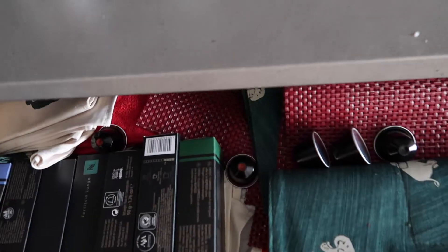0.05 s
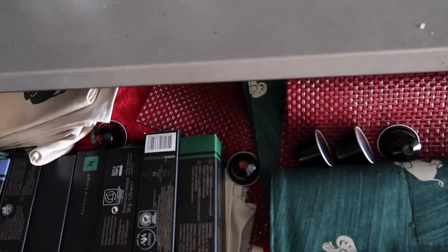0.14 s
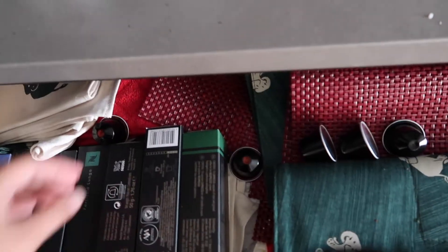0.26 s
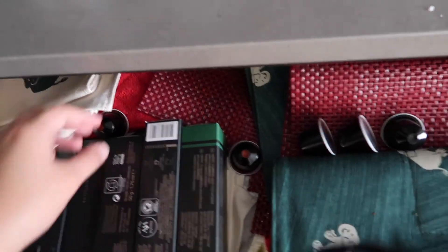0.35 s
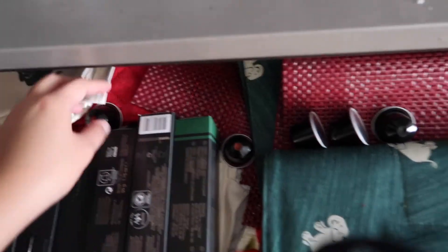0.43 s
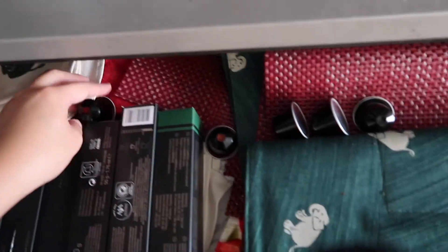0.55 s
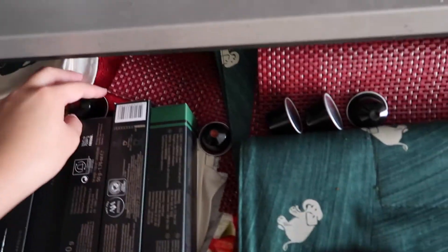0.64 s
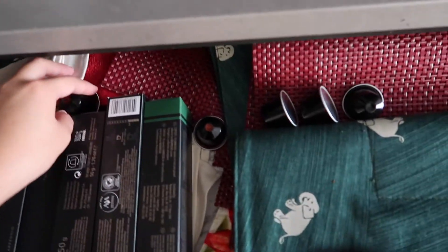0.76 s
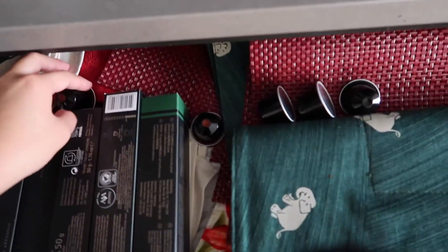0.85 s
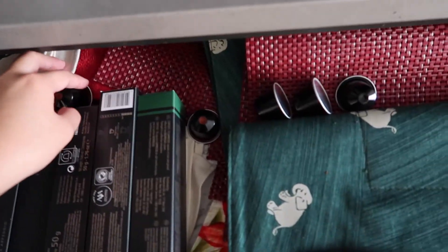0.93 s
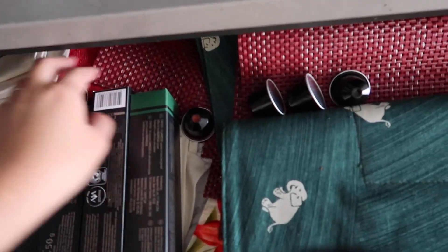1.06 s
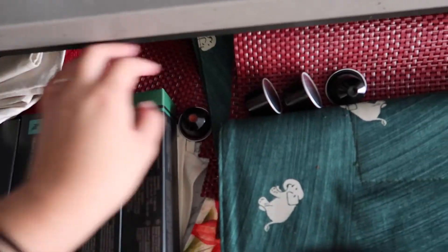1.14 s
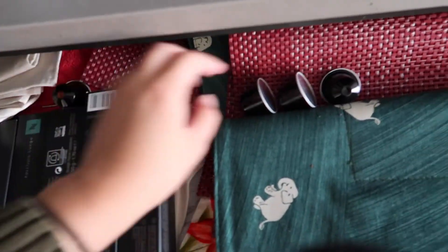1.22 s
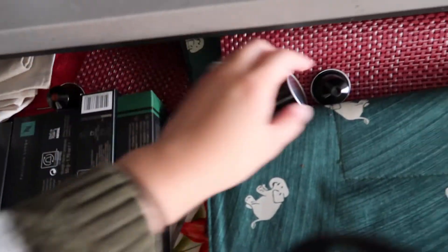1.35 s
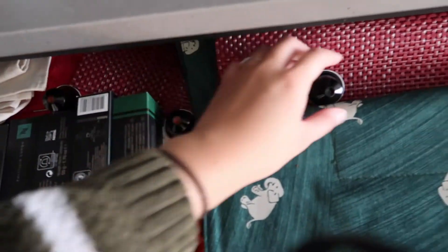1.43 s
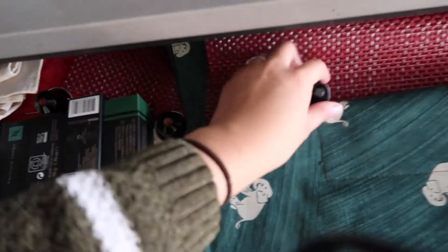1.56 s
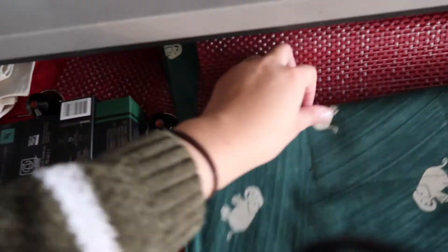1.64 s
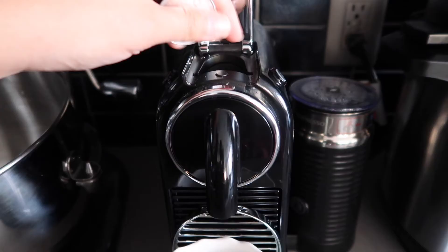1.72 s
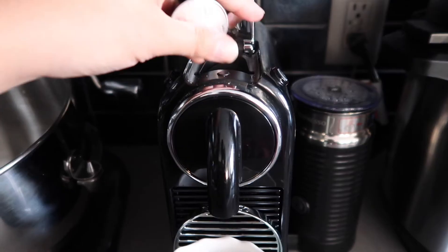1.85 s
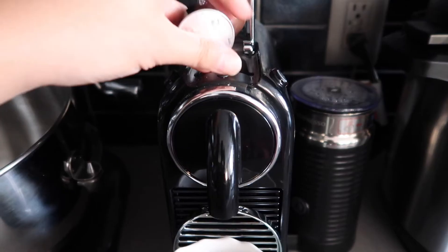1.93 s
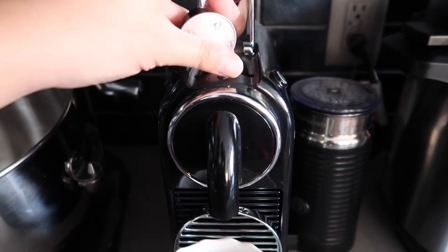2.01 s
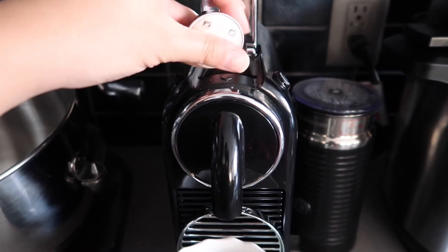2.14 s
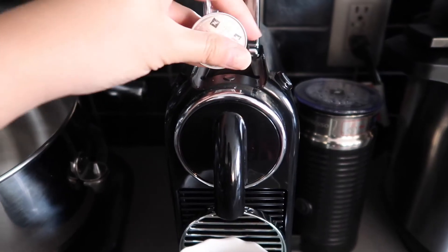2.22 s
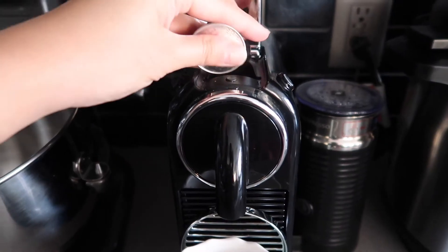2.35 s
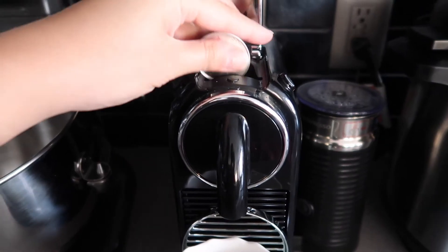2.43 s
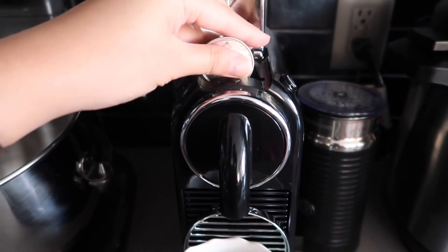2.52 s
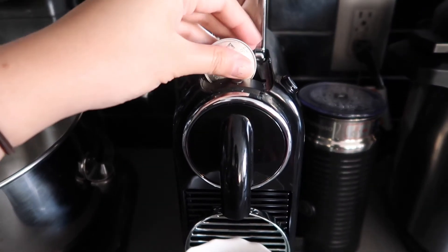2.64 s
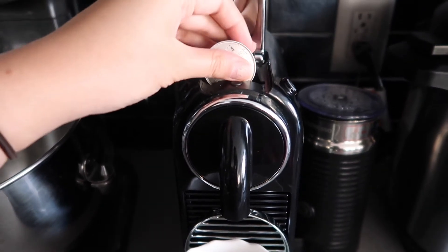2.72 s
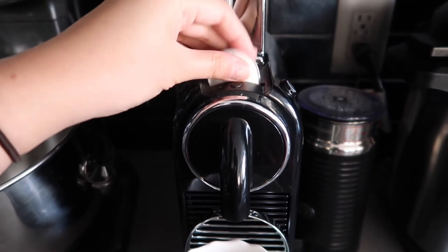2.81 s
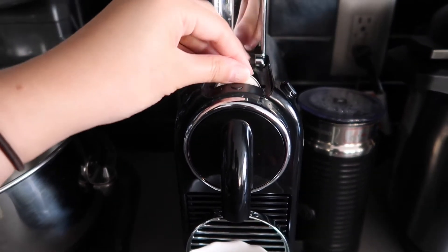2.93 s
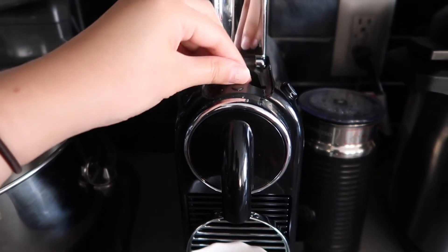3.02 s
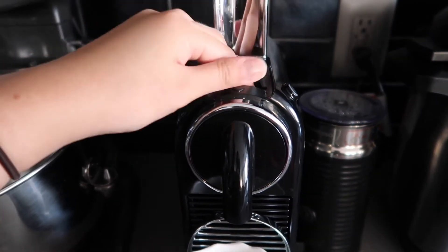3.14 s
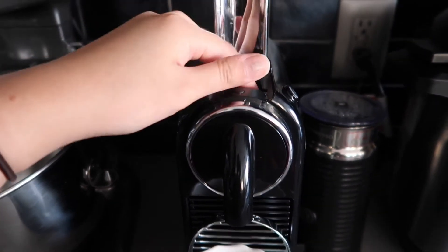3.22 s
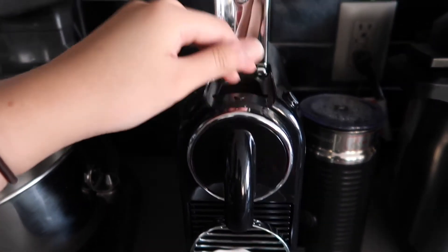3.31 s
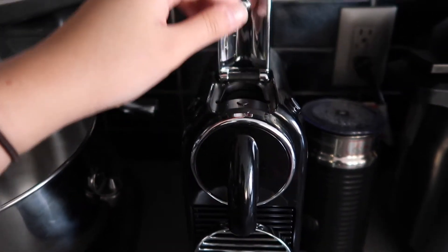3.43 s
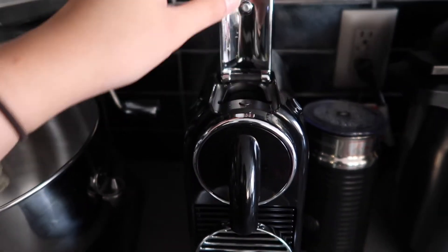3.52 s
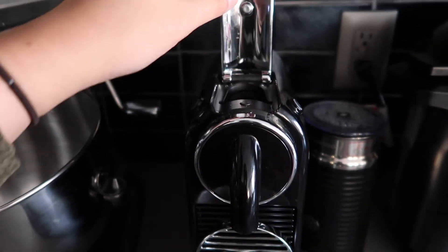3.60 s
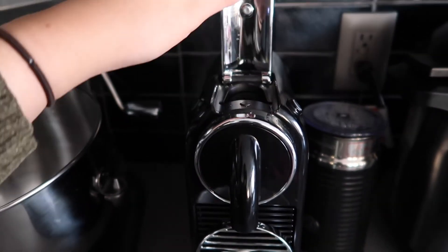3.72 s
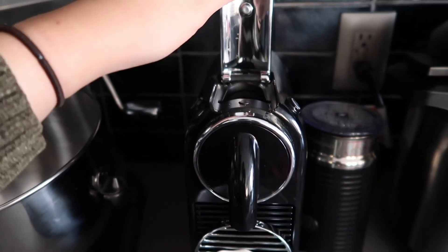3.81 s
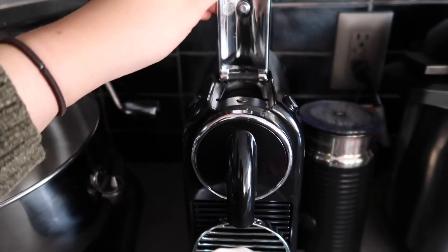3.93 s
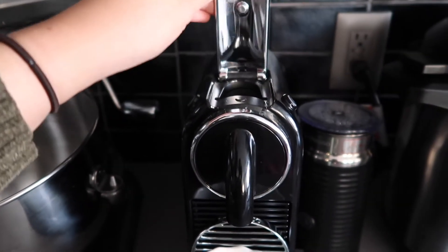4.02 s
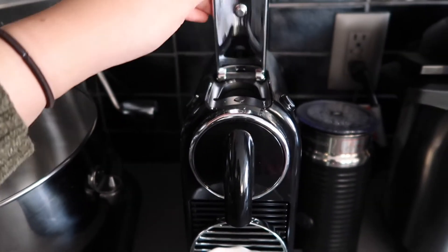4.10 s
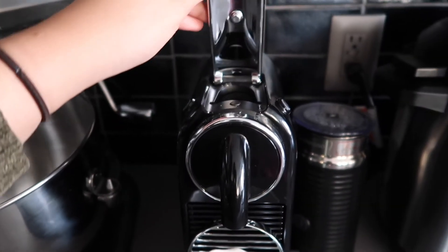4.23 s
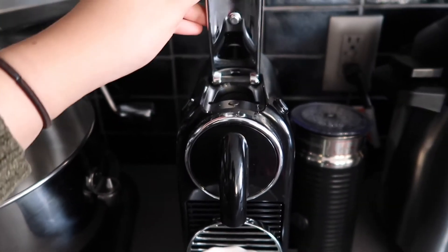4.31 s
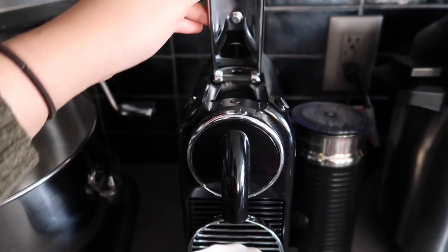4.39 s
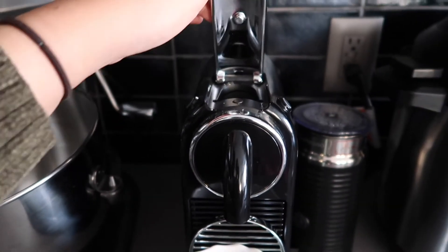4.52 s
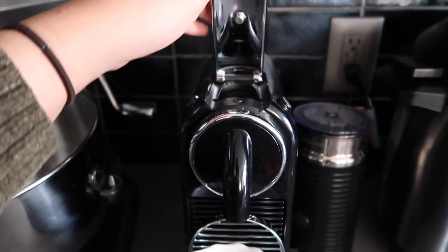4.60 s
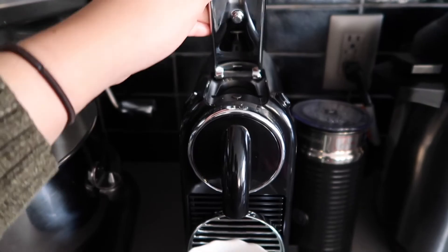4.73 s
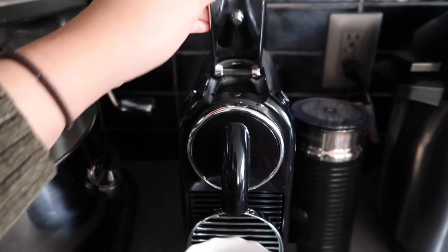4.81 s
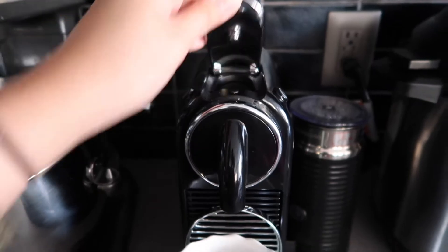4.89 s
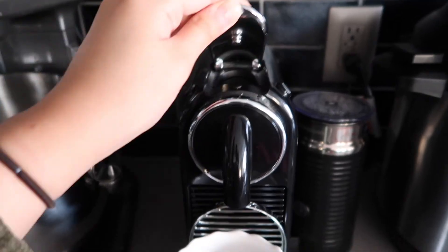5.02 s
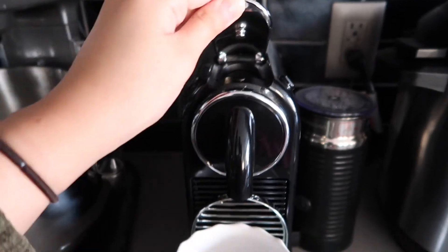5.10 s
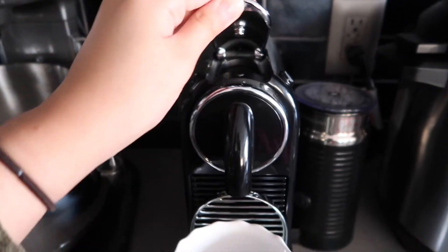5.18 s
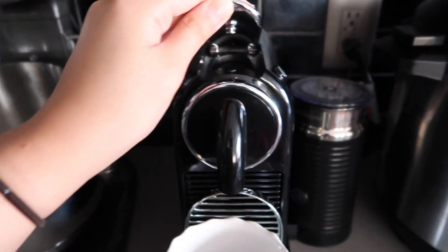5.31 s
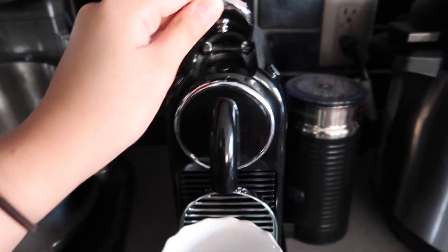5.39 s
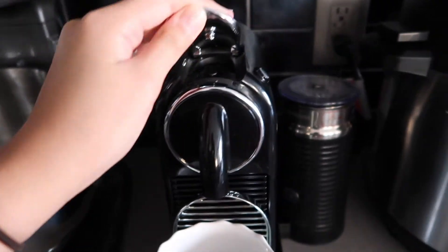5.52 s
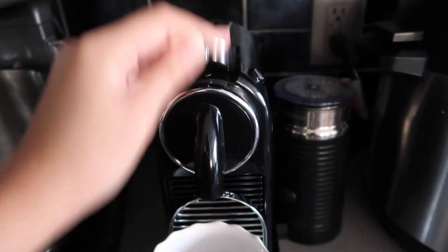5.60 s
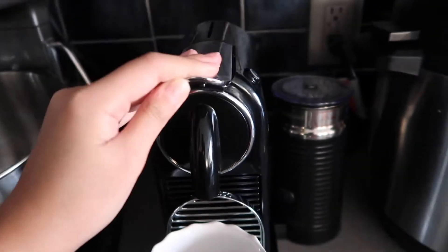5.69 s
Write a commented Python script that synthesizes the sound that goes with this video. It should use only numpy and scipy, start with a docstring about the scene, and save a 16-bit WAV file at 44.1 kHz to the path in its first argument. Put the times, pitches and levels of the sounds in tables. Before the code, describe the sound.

Fingers rummage softly among capsules, a capsule knocks into a machine, the metal lever clunks over, then slams shut sharply over quiet kitchen hum.

```python
"""Coffee capsules and a machine lever

Fingers rummage among coffee capsules in an open drawer; after a cut, at the machine, a capsule is pushed into
its slot and the metal lever is tipped, pulled over its catches and snapped shut. Touches and rubs are
bursts of tiny impacts that ring the drawer or the machine; the lever pivot creaks and its hinge squeaks.
A small kitchen echoes and hums; at the cut to the machine the recorder's automatic gain drops, then
recovers, which is heard on the hum. Faint steady tones lie beneath: a low drone and thin high lines."""
import sys
import numpy as np
from scipy import signal
from scipy.fft import rfft, irfft, next_fast_len
from scipy.io import wavfile

SR = 44100
rng = np.random.default_rng(int(sys.argv[2]) if len(sys.argv) > 2 else 0)


def generate_wav(sig):
    """Save sig (samples, or channels by samples) to the path in sys.argv[1] as 16-bit PCM at SR."""
    pcm = np.round(np.clip(np.atleast_2d(sig).T, -1, 1) * 32767).astype(np.int16)
    wavfile.write(sys.argv[1], SR, pcm)


def volts_from_db(level):
    """Convert decibel levels to linear amplitude ratios."""
    exponent = np.asarray(level, float) / 20
    return 10 ** exponent


N = 253575
T = np.arange(N) / SR
CUT_S = 1.735   # the scene cuts from drawer to machine, ending all drawer sound
SILENT_DB = -200


def rms_one(x):
    """Scale a sound to an average strength (rms) of 1."""
    return x / np.sqrt(np.mean(x ** 2) + 1e-20)


def at_hz(points, hz):
    """Read a curve of (f/Hz, value) points, with pitch on a log axis."""
    point_hz, value = np.transpose(points)
    return np.interp(np.log(hz), np.log(point_hz), value)


def drift(rate_hz):
    """Slow random wandering with spread 1: smoothed noise, made at every 40th sample."""
    r = np.exp(-2 * np.pi * rate_hz * 40 / SR)
    noise = rng.standard_normal(N // 40 + 2002)
    slow = signal.lfilter([1], [1, -2 * r, r * r], noise)[2000:]   # skip the filter's start
    return np.interp(np.arange(N) / 40, np.arange(len(slow)), rms_one(slow))


def band(x, low_hz, high_hz):
    """Keep only the pitches between two limits (Butterworth band-pass)."""
    return signal.sosfilt(signal.butter(2, [low_hz, high_hz], "band", fs=SR, output="sos"), x)


def low_pass(x, order, cut_hz):
    """Take away the pitches above a limit (Butterworth low-pass)."""
    return signal.sosfilt(signal.butter(order, cut_hz, fs=SR, output="sos"), x)


def ring(force, hz, t60):
    """A resonance: a unit click starts a sine of height 1 that fades by 60 dB in t60 seconds."""
    r, w = volts_from_db(-60 / (t60 * SR)), 2 * np.pi * hz / SR
    return signal.lfilter([0, np.sin(w)], [1, -2 * r * np.cos(w), r * r], force + 1e-18)


def grit(per_s, spread_db):
    """Rough contact: tiny impacts at random times, of random size and sign; rms 1."""
    sizes = volts_from_db(spread_db * np.minimum(rng.exponential(1, N), 5)) * rng.choice([-1, 1], N)
    return rms_one(sizes * (rng.random(N) < per_s / SR))


def swells(rows):
    """Turn rows of (start, strongest, end, dB ..) into one rising and falling gain per dB column."""
    # an end before the strongest moment cuts the rise short; an end before the start leaves silence
    return sum(volts_from_db(np.array(levels_db))[:, None] * np.interp(T, [start, top, end], [0, 1, 0]) ** 1.47
               for start, top, end, *levels_db in rows)


# colour of the hum, relative: f/Hz, level/dB (per Hz)
HUM_COLOUR = [(24, -33), (40, -2.5), (55, -4), (151, -1.5), (174, -10.5), (244, -6.5), (319, -9), (377, -9),
              (944, -20.5), (1290, -21.5), (1570, -23.5), (1860, -24), (12800, -42), (16600, -57),
              (22000, -120)]
# how alike left and right are: f/Hz, likeness (1 = same, 0 = unrelated, -1 = opposite)
HUM_LIKENESS = [(60, 1), (180, 0.85), (550, 0.3), (1650, -0.0025), (4970, 0.33), (15000, -0.68)]
# faint steady tones, a low drone and thin high lines: f/Hz, width to either side/Hz, level/dB
STEADY_TONES = [(32.2, 3.1, -58), (1314, 19, -73.5), (12920, 25, -84.5)]


def hum(patchy_db):
    """Kitchen hum of flickering half-octave noise bands under the recorder's gain, plus faint steady tones."""
    out, edges = 0, 26 * 2 ** np.arange(0, 9.6, .5)
    white = rng.standard_normal((2, 2, N + SR // 4))
    for k, (low, high) in enumerate(zip(edges, edges[1:])):
        mid, side = band(white[k % 2], low, high)[:, SR // 4:]
        hz = np.sqrt(low * high)
        alike = np.clip(at_hz(HUM_LIKENESS, hz), -1, 1)
        gain = volts_from_db(at_hz(HUM_COLOUR, hz) + patchy_db * drift(9.2))
        out = out + gain * (np.sqrt(1 + alike) * mid + np.sqrt(1 - alike) * side * [[1], [-1]])
    out = low_pass(out, 8, 13400)
    # at the cut to the machine the recorder's automatic gain drops, then recovers
    base_db, drop_db, recovery_s = -49, -8, 0.44
    drop = np.exp(-np.abs(T - CUT_S) / recovery_s)
    level_db = np.where(T < CUT_S, base_db, base_db + drop_db * drop)
    tones = sum(volts_from_db(db) * rms_one(band(white[0, 0, :N], hz - width, hz + width))
                for hz, width, db in STEADY_TONES)
    return volts_from_db(level_db) * rms_one(out) + tones


# touches: t/s, surface click level/dB, sharpness/dB (tick over click), body knock level/dB,
# height/dB (how far the knock leans to its high band)
TOUCHES = [(0.5431, -46, -16, -44, 1.5), (0.5852, -37, -13, -57, 3.5), (0.5966, -32.5, -15, -51, -7),
           (0.6164, -52, 3, -37, -2.5), (0.8564, -53, -21, -45, -4), (1.066, -39, -17, -34, -2.5),
           (1.1487, -44, -20, -45.5, 7), (1.1648, -59, -9, -46, 5), (1.499, -43, -20, -49.5, -2),
           (1.5361, -37.5, -17, -54.5, -9.5), (1.559, -45, -9, -53, 1), (1.5812, -30, -14, -48.5, -7),
           (1.6259, -29, -2, -42.5, 8.5), (1.655, -45, 3, -45, -5.5), (1.7136, -37.5, -2.5, -45.5, 0.5),
           (2.4763, -33, -2, -41.5, 6.5), (2.4966, -31.5, -21, -42, 7.5), (2.5035, -38, -21, -38.5, -2),
           (2.7809, -36, -33, -48, 4.5), (2.827, -37, -23, -53, -4), (2.8525, -24.5, 1, -32.5, 2),
           (3.0677, -20.5, -41, -39.5, 6), (3.0722, -23, -18, -29, -5), (3.0796, -25, -17, -42, -7),
           (3.2615, -38, -27, -53.5, 2), (3.828, -38.5, -37, -33, -1.5), (4.036, -70, -13, -42.5, -3.5),
           (4.0834, -50.5, 7.5, -33.5, 0), (4.121, -51, -14, -41, -6), (4.1455, -35, -26, -29, 2.5),
           (4.1646, -29.5, -20.5, -38.5, -0.8), (4.6873, -34.5, -20, -43, 0.2), (4.8506, -32, 3, -24, -2.5),
           (4.8603, -28, -6, -26, 0), (4.8788, -34, -16, -33, 0), (4.892, -49, 10, -26, 2.2),
           (4.9058, -20, -3.5, -22.5, 3), (5.6125, -58, -9, -39.5, -3), (5.639, -44, -25, -49, -1),
           (5.659, -5.5, -18.5, -9.5, 0), (5.6629, -11.5, -11, -14.5, 1), (5.6748, -35, -27, -50, -3.5),
           (5.7019, -38, -18, -42, -8)]


def touches():
    """Short contacts, as rows of (s, dB in each band): a click of the surface and a knock of the body."""
    leak_db, click_share, between_db = -14, 0.58, -3
    rows = []
    for s, click_db, sharp_db, knock_db, high_db in TOUCHES:
        low, high = knock_db - high_db, knock_db + high_db
        between = click_share * click_db + (1 - click_share) * high + between_db
        # some of the low knock leaks into the thud band
        rows.append((s, click_db, low + leak_db, low, high, between, click_db + sharp_db))
    return rows


# fingers and foil scratching over surfaces: start t/s, strongest t/s, end t/s, level/dB, sharpness/dB
SCRATCHES = [(0.575, 0.584, 0.75, -48.5, -13), (0.92, 1.038, 1.06, -51.5, -11.5),
             (1.15, 1.162, 1.24, -64, -14), (1.405, 1.645, 1.68, -62, -5), (1.622, 1.621, 1.82, -56.5, -4),
             (2.307, 2.366, 2.58, -73, 5), (2.805, 2.841, 2.909, -40, -5.5),
             (3.07, 3.077, 3.25, -58.5, -10), (3.828, 3.9, 4.12, -67, -22), (4.106, 4.12, 4.26, -61, -11),
             (4.802, 4.882, 5, -49, -25), (5.602, 5.66, 6.4, -56.5, -21), (5.66, 5.683, 5.23, -43.5, -16)]


def scratches():
    """Scratching surfaces push the click band, its lower neighbour and the tick band."""
    quiet, lower_db = SILENT_DB, -0.5
    return [(*when, db, quiet, quiet, quiet, db + lower_db, db + sharp_db)
            for *when, db, sharp_db in SCRATCHES]


# boxes, capsule and lever dragging their weight: start t/s, strongest t/s, end t/s, level/dB,
# height/dB (how far the drag leans to the high knock band)
DRAGS = [(0.578, 0.584, 0.67, -64, -11), (0.926, 1.036, 1.03, -58.5, 7), (1.14, 1.152, 1.202, -56, 14.5),
         (1.423, 1.664, 1.78, -58, -2), (1.632, 1.637, 1.66, -52, 0), (2.785, 2.834, 3.08, -59, 7.5),
         (3.07, 3.096, 3, -48, -12), (3.792, 3.835, 4.1, -52, -1.5), (4.09, 4.105, 4.19, -44, -1),
         (4.776, 4.884, 5.06, -41, -5.5), (5.584, 5.65, 5.6, -53, 1.5), (5.65, 5.652, 5.55, -36, -1)]


def drags():
    """Dragged weight pushes the two knock bands and their neighbours."""
    quiet, lower_db, upper_db = SILENT_DB, -5, -14
    rows = []
    for *when, db, high_db in DRAGS:
        low, high = db - high_db, db + high_db
        rows.append((*when, quiet, low + lower_db, low, high, high + upper_db, quiet))
    return rows


# heavy contacts thudding into drawer or counter: t/s, level/dB
THUDS = [(0.5955, -55), (0.6164, -40), (1.5812, -51), (1.6247, -42), (1.655, -34), (1.713, -40),
         (3.0725, -39), (3.8272, -38), (4.1646, -32.5), (4.6852, -36), (4.8511, -31), (4.8782, -20),
         (4.893, -34), (4.9075, -24), (5.659, -10), (5.6643, -16), (5.6751, -20), (5.7027, -33)]


def thuds():
    """The weight of a heavy contact pushes the thud band alone."""
    return [(s, SILENT_DB, db) + (SILENT_DB,) * 4 for s, db in THUDS]


# one entry per band of force: added to every contact, level/dB
STRIKE_DB = [9.8, 21.7, 22.54, 20.6, 18.4, 16.4]
# one entry per band of force: first touch over the chatter, level/dB
FIRST_TOUCH_DB = [8.1, 25, 23, 14.5, 18.7, 2.8]
# one entry per band of force: fading time of the lever's chatter, t60/s (the highest band dies first)
LEVER_CHATTER_S = [0.036, 0.058, 0.062, 0.055, 0.046, 0.012]


def contact_force(attack_ms):
    """Force per band of touches and thuds: a sharp first touch, then a dying chatter of tiny impacts."""
    out = np.zeros((len(BANDS_HZ), N))
    chatter = grit(per_s=6100.0, spread_db=-0.5)
    lever_t60 = np.array(LEVER_CHATTER_S)[:, None]
    for s, *levels_db in touches() + thuds():
        i = round(s * SR)
        t = T[:min(SR // 8, N - i)]
        t60 = lever_t60 * (0.89 if s < CUT_S else 1)   # light capsules chatter for a shorter time
        burst = chatter[i:i + len(t)] * volts_from_db(-60 * t / t60) * (1 - np.exp(-t * 1000 / attack_ms))
        burst[:, 0] = volts_from_db(FIRST_TOUCH_DB)
        burst /= np.sqrt(np.sum(burst ** 2, axis=1, keepdims=True))   # same energy for every burst
        out[:, i:i + len(t)] += volts_from_db(np.add(levels_db, STRIKE_DB))[:, None] * burst
    return out


def rub_force():
    """Force per band of scratches and drags: unevenly flickering grit that swells and fades."""
    flicker_db = 3.14 * np.array([drift(49) for _ in BANDS_HZ])
    return swells(scratches() + drags()) * grit(per_s=9000.0, spread_db=2.5) * volts_from_db(flicker_db)


# bands of force, in order click, thud, low knock, high knock, between, tick: lowest f/Hz, highest f/Hz
BANDS_HZ = [(2500, 6500), (85, 220), (220, 650), (650, 1200), (1200, 2500), (6500, 13500)]


def body(modes, force, crack_db):
    """Each band of force rings the resonances inside it; part of the force sounds at once as a crack."""
    out = 0
    unit = np.eye(1, SR // 2)[0]
    for push, (low, high), crack in zip(force, BANDS_HZ, crack_db):
        inside = [m for m in modes if low <= m[0] < high]

        def answer(x):
            # neighbouring resonances swing in opposite directions
            rings = sum((-1) ** k * volts_from_db(db) * ring(x, hz, t60) for k, (hz, db, t60) in enumerate(inside))
            return band(band(rings + volts_from_db(crack) * x, low, high), .85 * low, 1.12 * high)
        # a unit click gives the same energy in every band
        out = out + answer(push) / np.sqrt(np.sum(answer(unit) ** 2))
    return out


# resonances of the drawer, levels relative: f/Hz, level/dB, t60/s
DRAWER_MODES = [(158, 10, 0.018), (267, 2.5, 0.052), (346, 2.5, 0.034), (564, 1, 0.031), (840, 6.5, 0.024),
                (1130, 6.5, 0.025), (1470, 2, 0.0036), (3160, -11, 0.018), (4420, -36, 0.024),
                (5540, -1, 0.0046), (8500, -8, .006), (10300, -30, .006)]


def drawer(force):
    """The drawer rings briefly when pushed."""
    return body(DRAWER_MODES, force, crack_db=[27.2, 36.0, 32.8, 25.5, 27.5, 22.0])


# resonances of the machine, levels relative: f/Hz, level/dB, t60/s
MACHINE_MODES = [(112, 9, 0.071), (271.5, 3.5, 0.044), (367.8, -2, 0.14), (441.5, -3, 0.077),
                 (575, 2, 0.025), (861.7, 2, 0.056), (1129, -2.5, 0.06), (1530, -5.5, 0.016),
                 (1650, -6.5, 0.021), (1980, -9, 0.026), (2498, -16, 0.084), (2865, -8, 0.059),
                 (3886, -6.5, 0.022), (4750, -48, 0.02), (6000, -31, 0.21), (7840, -8.5, 0.011),
                 (10500, -29, 0.0016)]


def machine(force):
    """The machine with its metal lever rings when pushed, some resonances clearly longer."""
    return body(MACHINE_MODES, force, crack_db=[26.3, 31.2, 28.8, 23.0, 34.7, 24.0])


def kitchen(x):
    """Room echo: a dense tail of reflections that dies faster in the treble, nearly alike left and right."""
    low_t60, treble_t60, split_hz = 0.38, 0.17, 4300
    t = T[:SR // 2]
    noise = rng.standard_normal((2, len(t))) * (1 - np.exp(-t / 0.0014))
    low = low_pass(noise, 1, split_hz)
    tail = low * volts_from_db(-60 * t / low_t60) + (noise - low) * volts_from_db(-60 * t / treble_t60)
    mid, side = tail / np.sqrt(np.sum(tail[0] ** 2)) * volts_from_db([[0], [-17]])
    return signal.fftconvolve(x[None], [mid + side, mid - side], axes=1)[:, :N]


# the two microphone ports differ in phase, most in the treble: f/Hz, side level/dB
PORT_SIDE = [(100, -78), (1000, -30), (3000, -10), (6000, -4), (10000, -1.5), (16000, 1)]


def placed(x):
    """Both microphone ports hear nearly the same, and the kitchen answers."""
    swap_hz, kitchen_db = 1650, -15.5   # the lead swaps sides once per swap_hz as pitch rises
    size = next_fast_len(N + 4096)
    hz = np.maximum(np.fft.rfftfreq(size, 1 / SR), 1)
    lead = 1j * volts_from_db(at_hz(PORT_SIDE, hz)) * np.cos(np.pi * hz / swap_hz)
    side = irfft(rfft(x, size) * lead, size)[:N]
    return x + side * [[1], [-1]] + volts_from_db(kitchen_db) * kitchen(x)


# resonances of the lever pivot: f/Hz, t60/s
PIVOT_MODES = [(1300, 0.017), (2830, 0.03), (5050, 0.084)]
# drags of the pivot: start t/s, strongest t/s, end t/s, then level/dB for each of the three resonances
CREAKS = [(4.639, 4.663, 4.76, -49, -55.5, -71), (4.78, 4.84, 5, -54, -54, -58),
          (4.832, 4.842, 4.852, -40, -63, -80)]


def creaks():
    """Dense little slips of the dragging lever pivot keep its resonances singing."""
    slips = grit(per_s=11000.0, spread_db=1.0)
    return sum(gain * rms_one(ring(slips, hz, t60)) for gain, (hz, t60) in zip(swells(CREAKS), PIVOT_MODES))


# the lever hinge squeaks up and down: t/s, f/Hz, level/dB
HINGE_SQUEAK = [(5.33, 10200, -95), (5.37, 11100, -76), (5.43, 12200, -74), (5.48, 11200, -75),
                (5.529, 10000, -81)]


def squeak():
    """The hinge gives a thin, wavering, gliding whistle with a weaker one below it."""
    s, hz, level_db = np.transpose(HINGE_SQUEAK)
    phase = 2 * np.pi * np.cumsum(np.interp(T, s, hz)) / SR
    gain = volts_from_db(np.interp(T, s, level_db, -150, -150) + 2.24 * drift(40))
    return gain * (np.sin(phase) + volts_from_db(-5) * np.sin(.845 * phase))


def handling():
    """Drawer first, machine afterwards; the scene cut ends all drawer sound, echo included."""
    force = contact_force(attack_ms=0.061) + rub_force()
    before = np.clip((CUT_S - T) / 0.00091, 0, 1)
    at_drawer = drawer(force * before)
    at_machine = machine(force * (T > CUT_S + .1)) + creaks() + squeak()
    return before * placed(at_drawer) + placed(at_machine)


def scene():
    """Hands at work over the kitchen hum."""
    return handling() + hum(patchy_db=2.0)


def band_limit(x):
    """A steep low-pass at the top of the band."""
    return signal.sosfilt(signal.butter(12, 16650, fs=SR, output="sos"), x)


def record(dry):
    """The microphone loses the highest treble and the loudest peaks are rounded."""
    heard = low_pass(dry, 6, 14200)
    mix = 1.666 * np.tanh(heard / 1.538)
    return band_limit(mix)


dry = scene()
out = record(dry)
generate_wav(out)
```